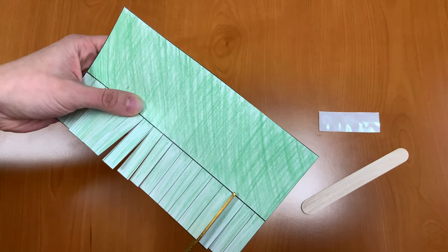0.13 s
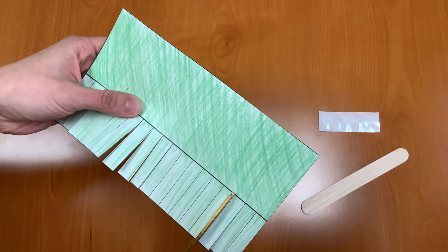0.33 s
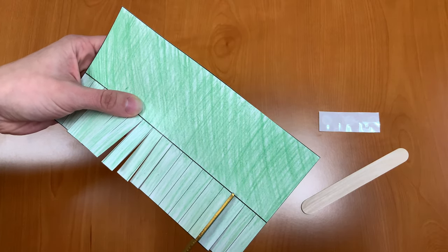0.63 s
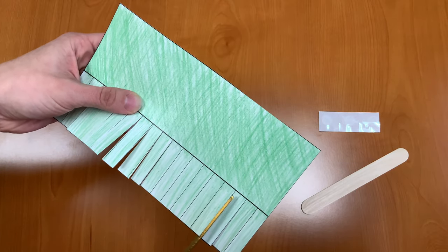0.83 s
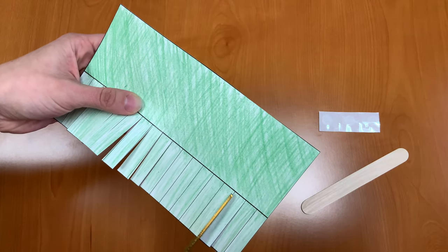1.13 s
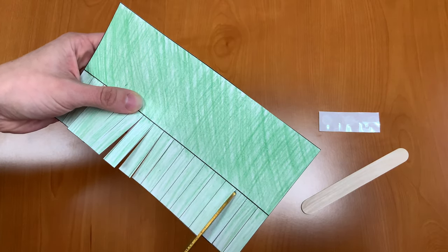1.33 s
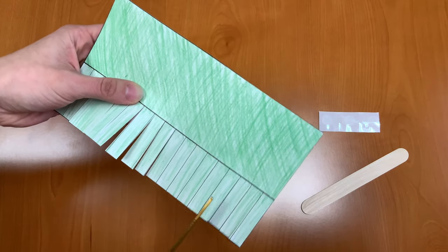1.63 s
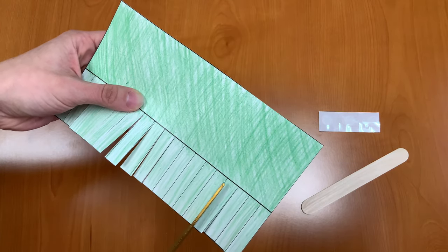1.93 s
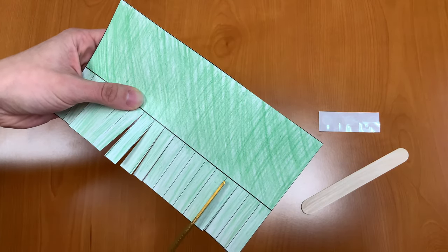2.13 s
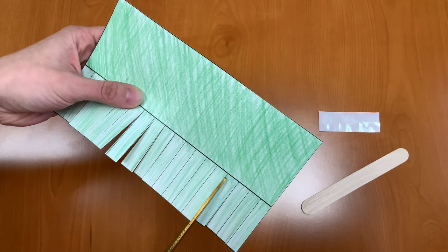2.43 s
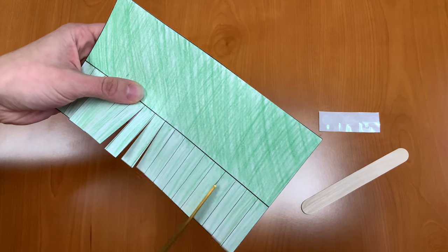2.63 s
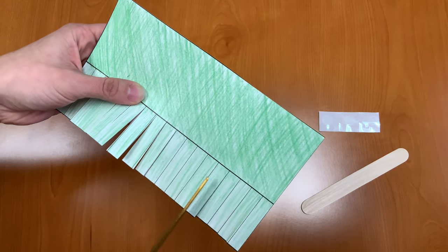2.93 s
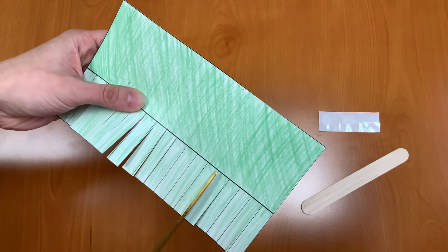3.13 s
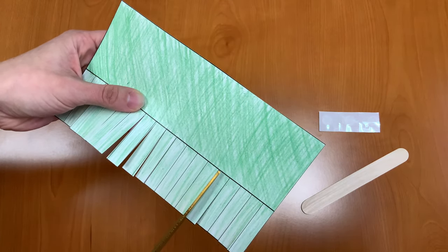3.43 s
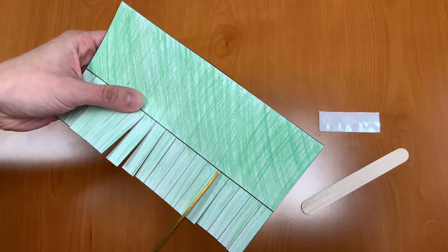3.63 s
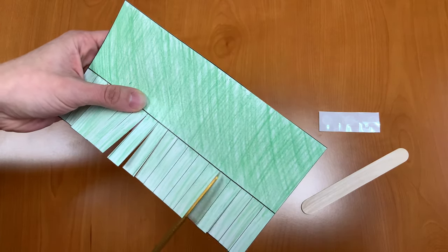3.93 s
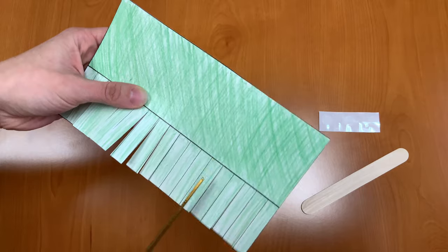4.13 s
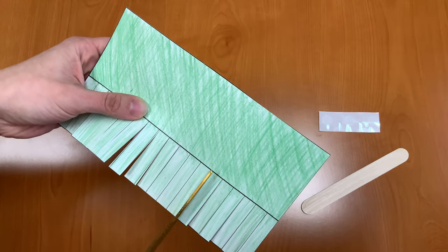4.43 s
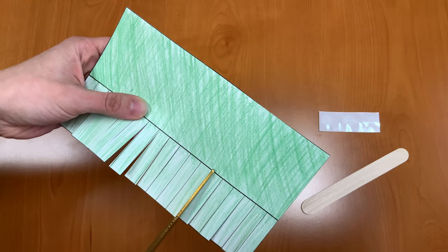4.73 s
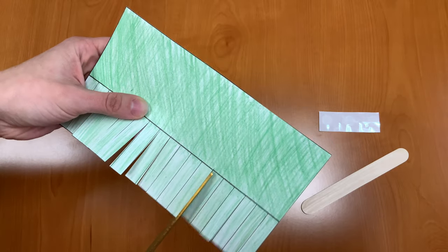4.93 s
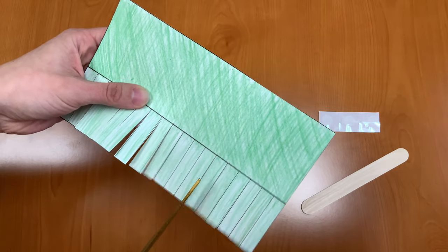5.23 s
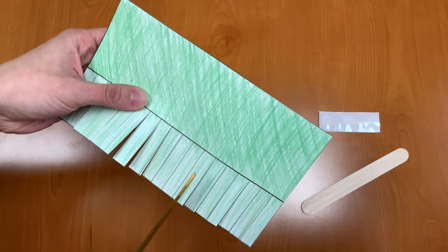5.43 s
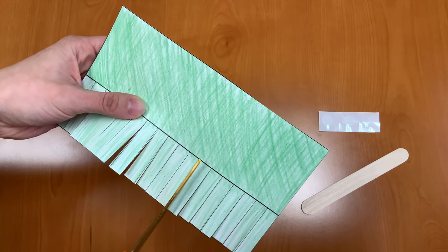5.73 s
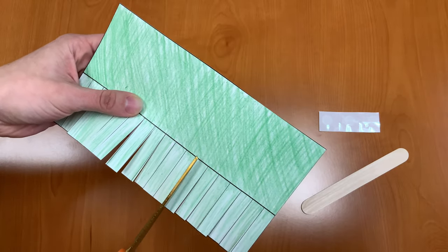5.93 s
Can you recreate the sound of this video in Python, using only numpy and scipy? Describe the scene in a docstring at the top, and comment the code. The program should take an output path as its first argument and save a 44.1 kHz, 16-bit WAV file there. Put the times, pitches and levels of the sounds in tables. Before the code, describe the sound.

A quiet indoor room with faint low rumble, a soft hum and slight microphone hiss, heard by close stereo microphones. For the first second there are only very faint brushes of blades on paper. From 1.1 s a crisp tear swells into the loudest, hard snap at about 1.2 s, with smaller ticks at 1.4-1.6 s and a faint slide. At 2.1-2.35 s a brighter crackling cut bites through paper, followed by shorter clicks until 2.7 s. Soft scraping and a dull tap fill the pause. Another crunchy bright cut comes at 3.55-3.8 s, with ticks around 3.9-4 s and a light blade slide. A gentler cut follows at 4.6-4.8 s, small snips near 5 and 5.2 s, faint scrapes to 5.6 s, and a last light, crisp cut begins at 5.9 s. Each has a short room tail.

```python
"""Scissors cutting paper

Scissors snip a fringe into a hand-held sheet of paper over a wooden table, close to two spaced microphones.
Stick-slip friction shears the fibres in jerks: each slip is a short burst of tiny breaks over a rubbing. The
breaks excite resonances of the blades and cut strips, hiss in the treble and shake the sheet. A short diffuse
tail follows the strokes; behind them lie a low rumble, a hum tone and a faint background hiss."""
import sys
import numpy as np
from scipy import signal
from scipy.fft import rfft, irfft, next_fast_len
from scipy.io import wavfile
from scipy.ndimage import uniform_filter1d

SR = 44100
rng = np.random.default_rng(int(sys.argv[2]) if len(sys.argv) > 2 else 0)


def invert_db(x):
    """Field ratio 10**(x/20) for x, a level in decibels (scalar or array-like)."""
    u = np.asarray(x, float) / 20
    return 10 ** u


def generate_wav(sig):
    """Save sig (samples, or channels by samples) to the path in sys.argv[1] as 16-bit PCM at SR."""
    pcm = np.round(np.clip(np.atleast_2d(sig).T, -1, 1) * 32767).astype(np.int16)
    wavfile.write(sys.argv[1], SR, pcm)


N = 267819

# The two kinds of stroke; the mode gains apply to low, high and edge bands and to the mode that sings out.
CUT = dict(grain_depth_db=2.5, sheet_db=-5, low_db=-3, high_db=2, edge_db=-0.5, sing_db=2,
           release_db_per_s=370)
SLIDE = dict(grain_depth_db=2.8, sheet_db=-12, low_db=-7, high_db=-2, edge_db=-10, sing_db=8,
             release_db_per_s=319)
# Paths to the two microphones: delay of the left, its polarity, left minus right, shared power (0-1).
STRIPS_WAY = dict(lag_ms=.91, sign=-1, pan_db=-1.5, shared=.9)
FIBRES_WAY = dict(lag_ms=.79, sign=-1, pan_db=.3, shared=.75)
SHEET_WAY = dict(lag_ms=-.25, sign=1, pan_db=3, shared=.97)

# Louder jerks of the blades and ticks of the paper; the last two columns are relative to force_db:
# start_s, force_db, length_ms, treble_db, sheet_db
SLIPS = [(1.081, -59.5, 8.7, 7, -10), (1.144, -39.5, 6.4, 5, -11), (1.216, -33.5, 4.5, 1, 3),
         (1.228, -20.5, 13, -11.5, -8), (1.449, -40, 13.6, -3.5, -8), (1.502, -53.5, 18, -2, 3),
         (1.623, -43.5, 4.6, -42, -9.5), (2.127, -62, 4, 10, -11), (2.145, -56.5, 11.5, 8.5, -4.5),
         (2.173, -57.5, 6.8, 11.5, -3.5), (2.2, -44, 8.1, 9, -7.5), (2.234, -46.5, 16, 3.5, -13),
         (2.273, -29, 13.7, -3.5, -15), (2.298, -40.5, 18, 3, -6), (2.337, -30, 10.2, 3, -12),
         (2.481, -52, 11, -7, -2.5), (2.517, -51.5, 9.7, 6.5, -27), (2.565, -39.5, 16, -6, -43),
         (2.622, -44.5, 19, -17, -13), (2.646, -56, 38, -13.5, 6.5), (2.681, -44, 5, -11.5, -5),
         (3.637, -47.5, 12, 9, -2), (3.666, -46, 7, 4, -7), (3.696, -36, 4.5, 1.5, -9.5),
         (3.726, -27.5, 9.7, 3.5, -18.5), (3.745, -28, 8.2, -5, -4), (3.766, -37.5, 21, -5, -10),
         (3.885, -49.5, 4.3, -19, 4), (3.928, -49, 25, -3, -36), (3.984, -33.5, 2.1, -8, -9),
         (4.005, -50.5, 13, 0, 2.5), (4.625, -46, 6.8, 6, -13), (4.655, -54.5, 8.7, 14.5, -16),
         (4.677, -50, 9.6, 9.5, -14.5), (4.731, -50, 14, -8, -10), (4.747, -37.5, 9.8, 4.5, -3),
         (4.764, -37.5, 12.5, 2.5, 0.5), (4.852, -47.5, 6.5, -7, -5), (4.954, -45, 24, 4, -39),
         (4.974, -41, 3.8, -10, -9), (5.2, -48, 7.4, -4.5, 0), (5.576, -48.5, 19, -8.5, -20.5),
         (5.934, -55.5, 6, 6, -8.5), (6.005, -53, 5.1, 9.5, -19.5), (6.031, -53, 6.2, 3, -26),
         (6.053, -42.5, 10.4, 4.5, -27)]


def scissors():
    """Superposition: one contact force drives four sets of resonances in parallel."""
    slips = SLIPS + knocks() + chatter()
    # the grain of the paper makes the rubbing uneven
    grain = flicker(60)
    cut_db, slide_db = CUT["grain_depth_db"] * grain, SLIDE["grain_depth_db"] * grain
    return (blades(slide_db) + strips(slips, cut_db, slide_db)
            + fibres(slips, cut_db, slide_db) + sheet(slips, cut_db, slide_db))


# Narrow resonances of the steel blades: pitch_hz, width_hz, level_db
BLADES = [(2600, 90, 0.5), (3680, 110, 0), (4620, 150, 1), (5850, 93, -2), (10860, 320, -3.5),
          (12500, 650, -2), (13600, 900, -1.5)]


def blades(slide_db):
    """Frictional excitation: lightly damped steel rings as the blades slide open."""
    # cuts hardly excite these modes
    force = rubbing(-60, slide_db - 12.5, treble=False)
    return ring(breaks(force, STRIPS_WAY, scatter_db=2.5), BLADES, contact(BLADES))


# Resonances of the cut strips: pitch_hz, width_hz, level_db
STRIPS = [(1279, 150, 1), (1540, 196, 2), (1852, 230, 1), (2179, 160, -1), (2576, 280, -6),
          (3053, 240, -5.5), (3337, 200, -3), (3790, 520, -13.5), (4500, 162, -1), (5310, 360, -6),
          (5484, 490, -7), (6690, 260, -8.5)]
HIGH_HZ = 3500


def strips(slips, cut_db, slide_db):
    """Contact-time filtering: a blunt knock pushes too slowly to reach the upper modes."""
    _, slip_db, _, treble_db, _ = np.transpose(slips)
    rub = rubbing(cut_db, slide_db, treble=False)
    force = rub + jerks(slips, slip_db, tail=0.25)
    blunt_force = rub + jerks(slips, slip_db + .5 * np.minimum(treble_db, 0), tail=0.48)
    blunt_db = 20 * np.log10(blunt_force / force)
    gains_db = [db + blunt_db * (hz > HIGH_HZ) for db, (hz, *_) in zip(contact(STRIPS), STRIPS)]
    return ring(breaks(force, STRIPS_WAY, scatter_db=6.5), STRIPS, gains_db)


# Broad treble resonances of the fibre hiss: pitch_hz, width_hz, level_db
FIBRES = [(8270, 1800, -10), (10570, 800, 10.5), (12070, 6330, 6), (14000, 2790, 6)]


def fibres(slips, cut_db, slide_db):
    """Fracture noise: a crowd of tiny breaks fills broad treble bands with hiss."""
    _, slip_db, _, treble_db, _ = np.transpose(slips)
    rub = invert_db(0.49 * flicker(71)) * rubbing(cut_db, slide_db, treble=True)
    force = rub + jerks(slips, slip_db + treble_db, tail=0.29)
    return ring(breaks(force, FIBRES_WAY, scatter_db=4.0), FIBRES, contact(FIBRES))


# Low resonances of the whole sheet: pitch_hz, width_hz, level_db
SHEET = [(136, 210, -13), (268, 130, -5.5), (355.3, 62, 0), (493, 160, -0.5), (573.4, 217, -1.5),
         (815, 280, -5.5)]


def sheet(slips, cut_db, slide_db):
    """Forced plate vibration: a real cut shakes the sheet more than a dull slide."""
    _, slip_db, _, _, sheet_db = np.transpose(slips)
    rub = rubbing(cut_db + CUT["sheet_db"], slide_db + SLIDE["sheet_db"], treble=False)
    force = rub + jerks(slips, slip_db + sheet_db, tail=0.92)
    return ring(breaks(force, SHEET_WAY, scatter_db=6), SHEET, [wander(1.7) for _ in SHEET])


# Closing strokes that cut; sing_hz is the mode that sings out:
# start_s, end_s, start_level_db, end_level_db, sing_hz, treble_db
CUTS = [(1.077, 1.219, -65.5, -37, 1620, 2), (1.367, 1.451, -51, -45, 4550, -2),
        (2.128, 2.352, -64, -47.5, 3060, 0.5), (2.465, 2.566, -64, -46.5, 1550, -1.5),
        (2.686, 2.678, -42, -40.5, 2520, -5), (3.55, 3.757, -60, -45, 3200, 1.5),
        (3.862, 3.952, -48, -53.5, 1520, -1.5), (4.572, 4.743, -70.5, -39.5, 2490, 2),
        (4.896, 4.991, -51.5, -50.5, 4500, 3.5), (5.198, 5.22, -55.5, -53, 2460, -2),
        (5.932, 6.074, -60, -52, 2510, 4)]
# Blades opening or brushing along the paper:
# start_s, end_s, start_level_db, end_level_db, sing_hz, treble_db
SLIDES = [(0.01, 0.056, -65.5, -68, 1560, -19), (0.153, 0.269, -65.5, -81, 1590, -10),
          (0.634, 0.724, -56.5, -72, 3050, -15), (0.773, 0.857, -79, -73.5, 1550, -17),
          (0.876, 0.873, -63, -63, 4500, -16), (1.651, 1.8, -56.5, -60.5, 5850, -12.5),
          (2.804, 2.891, -60, -75.5, 2600, -6), (2.909, 3.07, -62.5, -63.5, 4620, -8.5),
          (3.986, 4.075, -58, -50, 2600, -8), (4.123, 4.305, -61.5, -59, 1685, -5),
          (5.24, 5.342, -58, -66, 1830, -15), (5.395, 5.443, -55, -51, 3680, -6),
          (5.464, 5.583, -63.5, -49.5, 3690, -8.5)]
ATTACK_DB_PER_S, TREBLE_SAG_DB_PER_S = 1295, 85


def rubbing(cut_db, slide_db, treble):
    """Sliding friction: each force rises fast, runs straight in dB, then dies exponentially, treble first."""
    t = np.arange(0, N / SR + .002, .001)
    out = 1e-6
    for table, kind, gain_db in ((CUTS, CUT, cut_db), (SLIDES, SLIDE, slide_db)):
        release_db_per_s = kind["release_db_per_s"] + treble * TREBLE_SAG_DB_PER_S
        level = 0
        for start, end, start_db, end_db, _, treble_db in table:
            run_db = np.interp(t, [start, end], [start_db, end_db]) + treble * treble_db
            attack_db = ATTACK_DB_PER_S * np.maximum(start - t, 0)
            release_db = release_db_per_s * np.maximum(t - end, 0)
            level = level + invert_db(run_db - attack_db - release_db)
        out = out + invert_db(gain_db) * curve(t, level)
    return out


LOW_HZ, EDGE_HZ = 2000, (6200, 9500)


def contact(modes):
    """Modal participation: the drive of each mode in dB wanders as the point of contact travels."""
    rows = sorted((start, sing_hz, kind["low_db"], kind["high_db"], kind["edge_db"], kind["sing_db"])
                  for table, kind in ((CUTS, CUT), (SLIDES, SLIDE))
                  for start, _, _, _, sing_hz, _ in table)
    start, sing_hz, low_db, high_db, edge_db, sing_db = np.transpose(rows)
    # each stroke's gains hold from 10 ms before its start until the next stroke
    now = np.maximum(np.searchsorted(start - .01, np.arange(N) / SR, "right") - 1, 0)
    gains_db = []
    for hz, width, _ in modes:
        band_db = (low_db * (hz < LOW_HZ) + high_db * (HIGH_HZ < hz < EDGE_HZ[0])
                   + edge_db * (EDGE_HZ[0] < hz < EDGE_HZ[1]))
        held_db = band_db + sing_db * np.exp(-((hz - sing_hz) / width) ** 2)
        gains_db.append(held_db[now] + wander(3))
    return gains_db


CHATTER_GAP_S, CHATTER_DB = .028, 6  # mean gap; mean level against the swell
CHATTER_GROWS = 0.582  # share of the swell of the cut, in dB
CHATTER_MS, CHATTER_TREBLE_DB, CHATTER_SHEET_DB = 4.7, 1, -8


def chatter():
    """Stick-slip: small bright slips recur at uneven gaps while the cut lasts, at most twelve a cut."""
    rows = []
    for start, end, start_db, end_db, *_ in CUTS:
        gap, size = rng.random((12, 2)).T
        times = start + CHATTER_GAP_S * np.cumsum(.5 + gap)
        for s, u in zip(times, size):
            if s < end:
                swell_db = CHATTER_GROWS * (end_db - start_db) * (s - start) / (end - start)
                slip_db = start_db + swell_db + CHATTER_DB + 6 * (u - .5)
                rows.append((s, slip_db, CHATTER_MS, CHATTER_TREBLE_DB, CHATTER_SHEET_DB))
    return rows


# The opening blades come to a stop: start_s, force_db
KNOCKS = [(0.26, -74.5), (1.861, -65), (3.143, -77), (4.341, -76.5), (5.662, -70)]
KNOCK_MS, KNOCK_TREBLE_DB, KNOCK_SHEET_DB = 7.5, -29, 17.5


def knocks():
    """Impact: a dull stop has little treble and mostly shakes the sheet."""
    return [(s, db, KNOCK_MS, KNOCK_TREBLE_DB, KNOCK_SHEET_DB) for s, db in KNOCKS]


def jerks(slips, force_db, tail):
    """Impulsive loading: bright tears swell, dull knocks start sooner; the fall scales with tail lengths."""
    force, t = np.zeros(N), np.arange(-SR // 25, SR // 12)
    for (s, _, ms, treble_db, _), db in zip(slips, force_db):
        x = t / (ms / 1000 * SR)  # time in slip lengths
        rise = np.clip(.46 + .02 * treble_db, .18, .5)
        swell = np.exp(-np.abs(x / rise) ** 3.9)
        fall = np.exp(-np.abs(x / tail) ** 0.91)
        at = np.clip(int(s * SR) + t, 0, N - 1)
        force[at] += invert_db(db) * np.where(x < 0, swell, fall)
    return force


def breaks(force, way, scatter_db):
    """Shot noise and partial coherence: dense uneven clicks reach two spaced microphones."""
    clicks = rng.standard_normal((3, N)) * invert_db(scatter_db * rng.standard_normal((3, N)))
    # each microphone also faces a part of the paper of its own
    common = np.sqrt(way["shared"]) * unit(clicks[0])
    own = np.sqrt(1 - way["shared"]) * unit(clicks[1:])
    left, right = force * (common + own)
    # a linear phase gives the delay of a fraction of a sample
    size = next_fast_len(N + 99)
    hz = np.arange(size // 2 + 1) * SR / size
    late = np.exp(-2j * np.pi * hz * way["lag_ms"] / 1000)
    left = irfft(rfft(left, size) * late, size)[:N]
    return np.array([way["sign"] * invert_db(way["pan_db"] / 2) * left, invert_db(-way["pan_db"] / 2) * right])


def ring(x, modes, gains_db):
    """Modal superposition: parallel two-pole resonances, each driven through its own changing gain."""
    out = 0
    for k, ((hz, width, db), gain_db) in enumerate(zip(modes, gains_db)):
        b, a = signal.iirpeak(hz, hz / width, SR)
        out = out + (-1) ** k * invert_db(db) * signal.lfilter(b, a, x * invert_db(gain_db))
    # plain noise comes out near rms 1
    return out / np.sqrt(sum(invert_db(2 * db) * np.pi * width / SR for _, width, db in modes))


def wander(db):
    """Random modulation: slow chance in the drive of one mode."""
    return db * flicker(20)


def flicker(rate):
    """Band-limited modulation: straight glides between random levels, rate of them a second."""
    k = int(SR / rate)
    return uniform_filter1d(np.repeat(rng.standard_normal(N // k + 1), k), k)[:N]


def curve(s, value):
    """Linear interpolation: a control curve at every sample."""
    return np.interp(np.arange(N) / SR, s, value)


def unit(x):
    """Power normalisation: scale to rms 1."""
    return x / np.sqrt(np.mean(x ** 2))


ROOM_T60_S, ROOM_DB = 0.28, -14


def room(x):
    """Diffuse reverberation: an exponentially decaying tail, duller than the direct sound."""
    t = np.arange(SR // 2) / SR
    dull = signal.lfilter([1], [1, -.75], rng.standard_normal((2, len(t))))
    tail = dull * invert_db(-60 * t / ROOM_T60_S) * (t > .003)
    tail = tail / np.sqrt(np.sum(tail ** 2) / 2)
    # the sides are swapped in the tail
    return invert_db(ROOM_DB) * signal.fftconvolve(x[::-1], tail, axes=1)[:, :N]


def tinted(points, channels):
    """Spectral shaping: steady white noise takes the relative spectrum of the points, at rms 1."""
    hz, db = np.transpose(points)
    f = np.arange(N // 2 + 1) * SR / N + 1
    shape = invert_db(np.interp(np.log(f), np.log(hz), db))
    return unit(irfft(rfft(rng.standard_normal((channels, N))) * shape, N))


# Relative spectrum of the room rumble: pitch_hz, density_db (per Hz)
ROOM_HUM = [(15, -10), (25, -6), (45, 4), (70, -16.5), (98, 0), (146, -10.5), (185, -18.5), (235, -30),
            (1000, -62.5)]
# Relative spectrum of the background hiss: pitch_hz, density_db (per Hz)
HISS = [(300, 2), (2200, -10.5), (7500, -9.5), (10500, -13), (13800, -19), (14400, -37)]
# Course of the low rumble of the room: start_s, level_db
RUMBLE = [(0.0, -66.5), (1.34, -62.5), (6.07, -59.5)]
TONE_HZ, TONE_DB, HISS_DB = 125.3, -68.5, -80.5


def background():
    """Coherence: long waves of rumble and hum are nearly alike on both sides; hiss is independent."""
    near, apart = tinted(ROOM_HUM, channels=2)
    rumble = invert_db(curve(*np.transpose(RUMBLE))) * (near + 0.095 * apart * np.array([[1], [-1]]))
    tone = invert_db(TONE_DB + 2.0 * flicker(5.8)) * np.sin(2 * np.pi * TONE_HZ * np.arange(N) / SR)
    balance = invert_db(np.array([[-1.3], [1.3]]))  # the right is louder
    return (rumble + tone) * balance + invert_db(HISS_DB) * tinted(HISS, channels=2)


def scene():
    """Superposition: the cutting with its room tail over the background."""
    cut = scissors()
    return cut + room(cut) + background()


def roll_off(x):
    """The treble ends steeply here."""
    return signal.sosfilt(signal.butter(12, 16710, fs=SR, output="sos"), x)


def record(dry):
    """Band limiting: a steep elliptic low-pass cuts off the top of the mix."""
    top_hz = 15900
    lowpass = signal.ellip(8, .2, 70, top_hz, fs=SR, output="sos")
    mix = signal.sosfilt(lowpass, dry)
    return roll_off(mix)


dry = scene()
out = record(dry)
generate_wav(out)
```